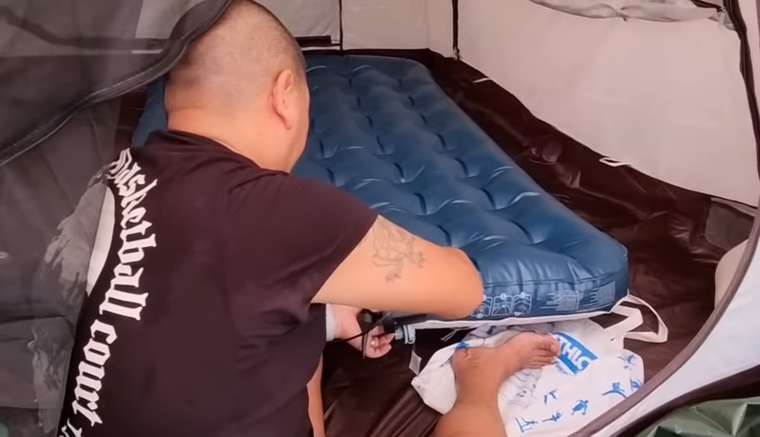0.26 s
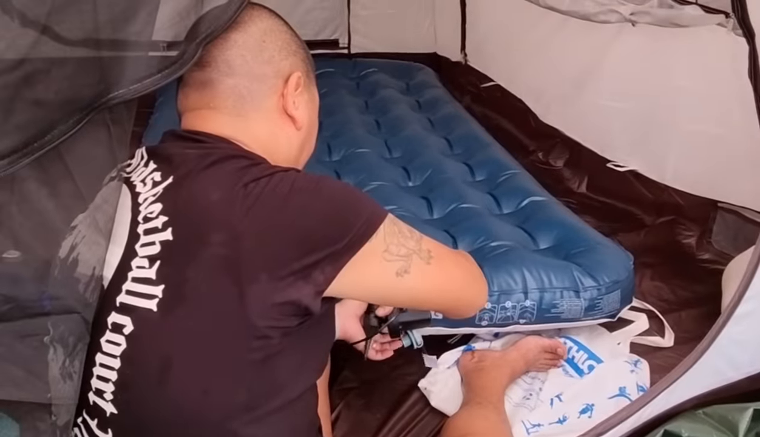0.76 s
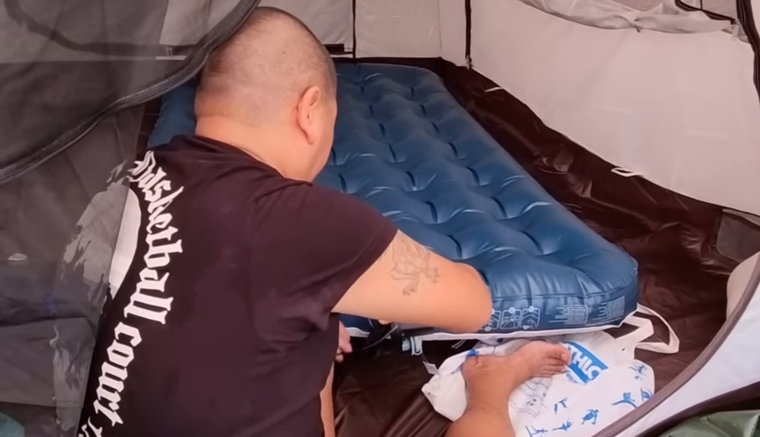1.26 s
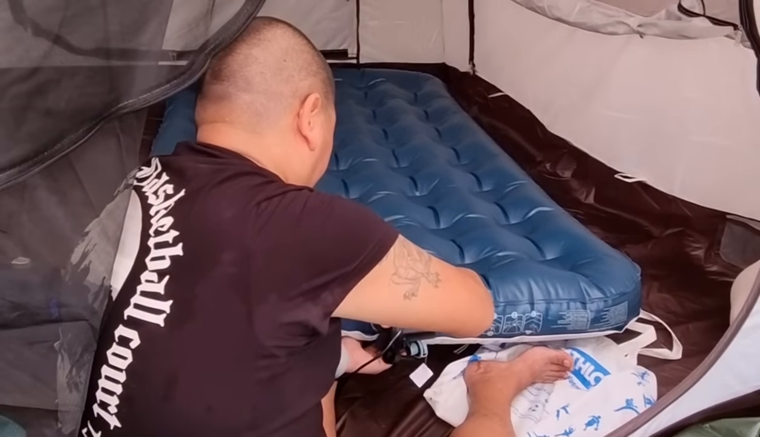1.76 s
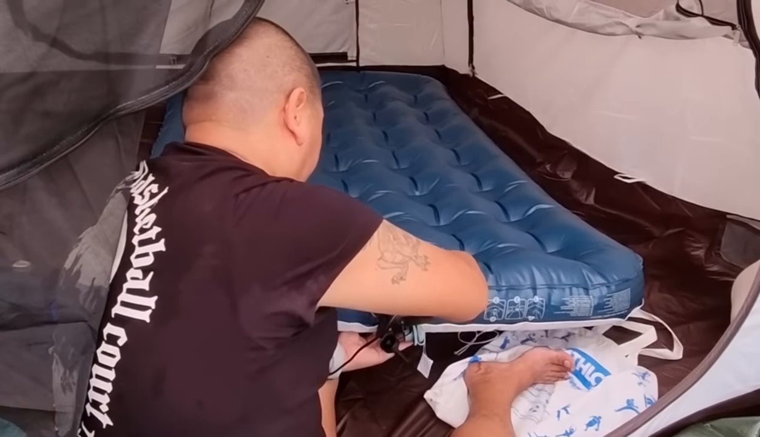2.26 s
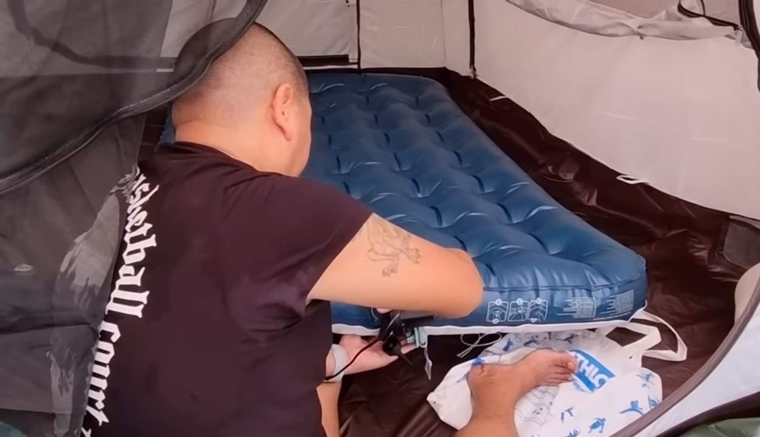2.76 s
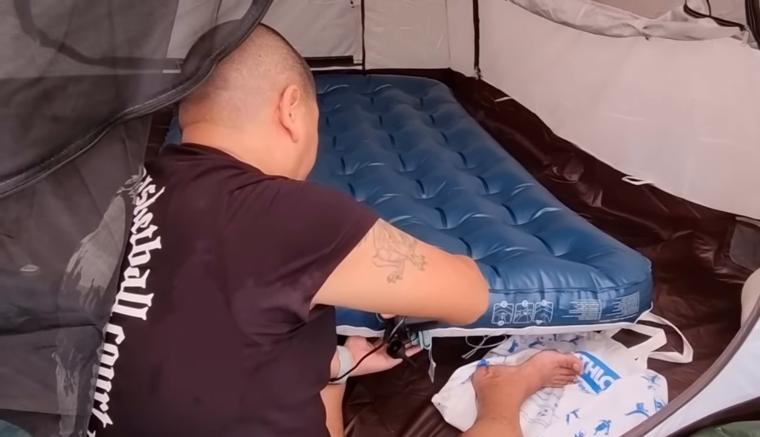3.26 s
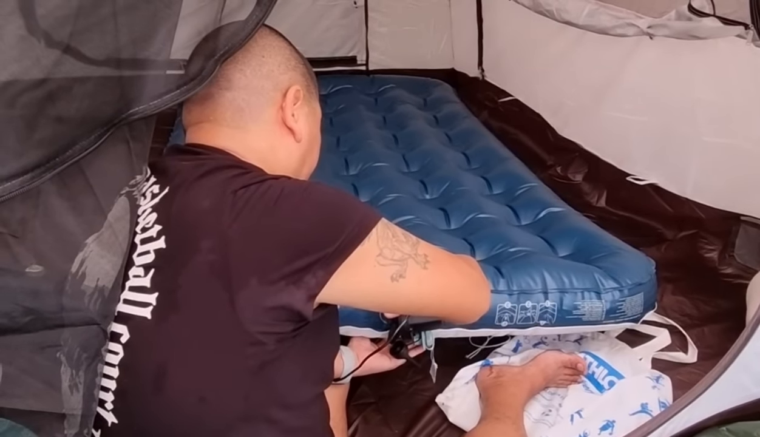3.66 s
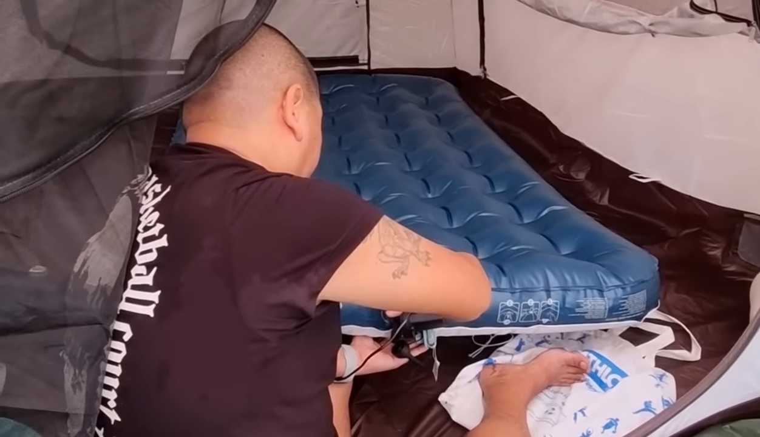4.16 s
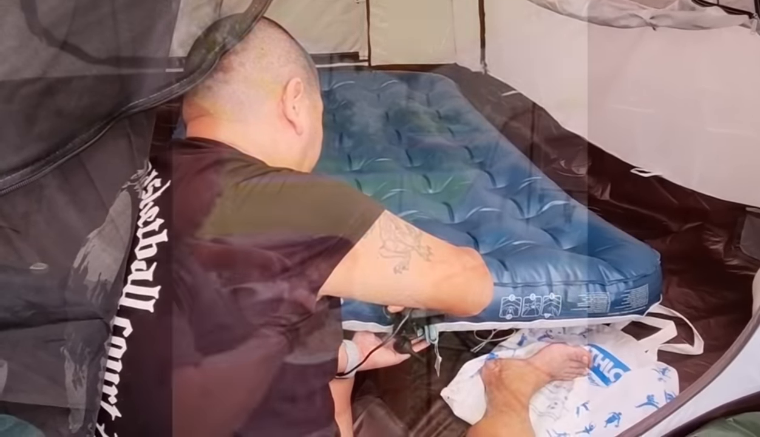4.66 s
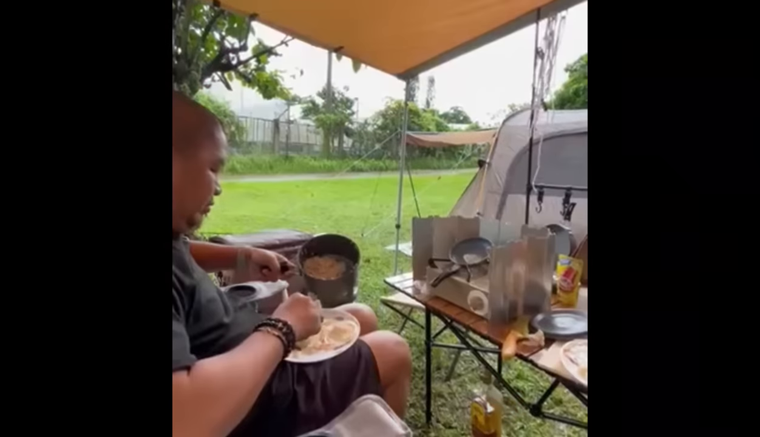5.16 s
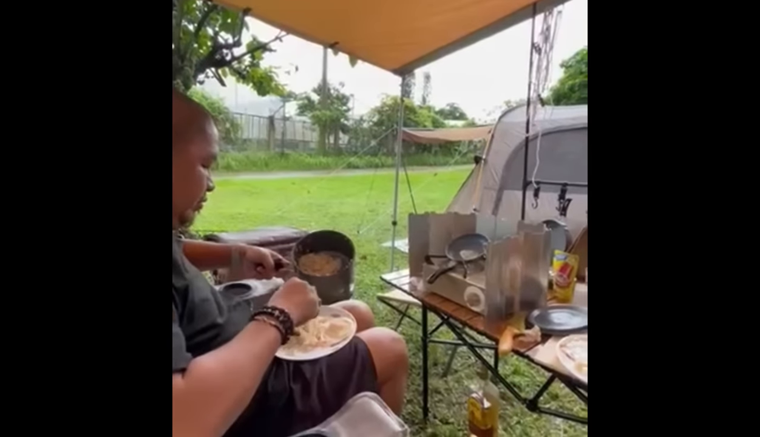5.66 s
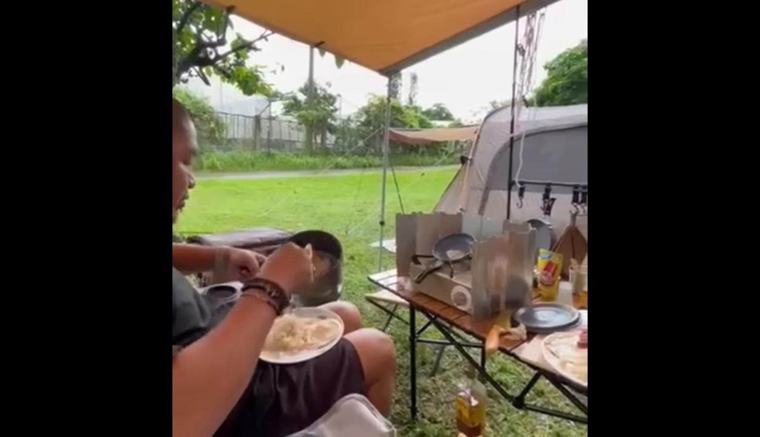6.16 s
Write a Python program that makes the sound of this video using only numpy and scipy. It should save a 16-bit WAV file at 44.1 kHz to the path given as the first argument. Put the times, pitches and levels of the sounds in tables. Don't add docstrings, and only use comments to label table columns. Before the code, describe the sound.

A small electric air pump whines and rushes inside a tent, cuts to brief silence, then cutlery clicks on a plate at a quiet campsite.

```python
import sys
import numpy as np
from scipy import signal
from scipy.fft import rfft, irfft, next_fast_len
from scipy.io import wavfile
from scipy.ndimage import uniform_filter1d

SR = 44100
rng = np.random.default_rng(int(sys.argv[2]) if len(sys.argv) > 2 else 0)


def natural_amplitude(level_db):
    exponent = np.asarray(level_db, float) / 20
    return 10 ** exponent


def materialize(psi):
    bounded = np.clip(np.atleast_2d(psi).T, -1, 1)
    quanta = np.round(bounded * 32767).astype(np.int16)
    wavfile.write(sys.argv[1], SR, quanta)


N = 282681
SIZE = next_fast_len(N)
FREQ_HZ = np.arange(SIZE // 2 + 1) * SR / SIZE
TIME_S = np.arange(N) / SR

START_HZ, RISE_HZ_PER_S, SLOWING_HZ_PER_S2 = 258.05, 3.95, .32
# time in seconds, seal 0-1.
NOZZLE_SEAL = [(0, 0.05), (.4, 0.12), (.7, .02), (1.17, 0.22), (1.27, 0.61), (1.45, 0.43), (1.58, 0.15),
               (1.72, 0), (1.78, 0.9), (1.87, 0.33), (1.97, 0.77), (2.08, 0.8), (2.15, 0.43), (2.21, 0.97),
               (2.45, 0.84), (3, 0.92), (4, 0.99), (4.75, 0.99)]
# time in seconds, shaft tone in dB.
PALM_COUPLING = [
    (0, -41.5),
    (.3, -41),
    (.5, -43),
    (.63, -39),
    (1.4, -38.5),
    (1.85, -39),
    (2.25, -36.5),
    (3.7, -36),
    (4.3, -34.5),
]
# multiple of shaft speed, then left early, left late, right early, right late in dB.
SHAFT_HARMONICS = [(2, -61, -48.5, -65, -52.5), (3, -70, -64, -38, -32), (4, -54, -40, -66, -67),
                   (5, -39, -41.5, -40.5, -52.5), (6, -40.5, -47.5, -42.5, -45),
                   (7, -45.5, -52, -44, -44.5), (8, -56, -59.5, -54.5, -61.5),
                   (9, -55.5, -56.5, -48.5, -53.5), (10, -55, -55, -55, -48), (11, -59, -49.5, -61, -53),
                   (12, -48.5, -50, -46, -43), (13, -52, -67, -48, -47), (14, -58, -65, -53.5, -58),
                   (15, -66, -64, -61, -61), (16, -56, -66.5, -52.5, -53), (17, -55, -64, -58, -53.5),
                   (18, -63, -60, -49.5, -50), (20, -64, -62, -70, -63.5), (24, -57, -49, -63, -54),
                   (25, -60, -62, -55.5, -52.5), (30, -55.5, -58, -55, -54.5), (35, -56, -58.5, -57, -58.5),
                   (36, -69, -57.5, -55, -72), (40, -66, -64.5, -62, -58)]
# right port lead early in rad, late in rad, change time in seconds.
GRIP_CHANGES = [(.8, 0, 3.2), (2.4, .5, 1.8), (2.5, .5, 1.6), (-2.2, -1.5, 1.4), (-3.1, -4.7, 1.2),
                (2.3, 1.8, 1.8), (-2.7, -2.8, 1.6), (2, -1.5, 2.9), (-2.5, 1.2, 1.15), (1.8, 3.1, 3.1),
                (3.1, 1.9, 1.15), (-2.9, -5.5, 2.6), (1, 2, 1.15), (1.5, 3.1, 1.9), (-.8, -3.3, 1.7),
                (2.3, .4, 2.6), (1.1, -2.6, 1.7), (-2.8, -5, 2.6), (3.1, 2.6, 1.05), (.7, 3.2, 1.2),
                (-1.7, -3.3, 3.1), (3.4, 2, .9), (-2.8, -2.2, 1.2), (-2.8, -4.4, 1.1)]
GRIP_CHANGE_S = .3
# multiple, middle in seconds, half length in seconds, boost in dB.
FLARES = [
    (12, 1.6, .4, 5),
    (14, .8, .35, 5),
    (30, .5, .3, 5),
    (13, 4.5, .4, 5),
    (30, 1.85, .2, 5),
    (16, .1, .25, 4),
    (16, 1.4, .3, 4),
    (7, 4, .5, 3),
]
# centre in Hz, width in Hz, left
# loose, left seated, right loose, right seated in dB per Hz, likeness of the ports -1 to 1, right port lead in
AIR_RESONANCES = [(106.2, 14.5, -56.5, -63, -52.5, -61.5, 0.99, -0.44),
                  (160, 23, -72, -68.5, -63, -67, 0.92, 0.4),
                  (299, 42, -78, -69.5, -69, -76.5, 0.3, 0.1),
                  (633, 54, -80.5, -71.5, -67, -70, 0.62, 1.14),
                  (833, 99, -73, -71, -57.5, -51.5, 0.61, -2),
                  (897, 61, -59.5, -61, -81, -64.5, 0.74, 0.4),
                  (978, 67, -64, -51.5, -59, -48, 0.95, 2),
                  (1111.5, 89, -70, -70, -59, -53.5, 0.79, 1.43),
                  (1160, 57, -71.5, -63, -66, -72, 0.44, -6), (1281, 73, -90, -64, -67, -60, 0.91, -2),
                  (1515, 88, -77, -64, -66.5, -55.5, 0.92, -2),
                     (1898, 82, -72.5, -66, -63.5, -63.5, 0.8, 3.5),
                     (2601, 174, -77, -67.5, -73.5, -62, 0.79, 1.85),
                     (2903, 160, -83, -75, -75, -66, 1, 4.5), (3170, 117, -85, -68, -73, -66, 0.26, 2.5),
                     (3570, 190, -87, -87, -79, -73, 0.41, 3.5),
                     (4265, 44, -71, -81, -68.5, -73.5, 0.37, -4),
                     (5150, 380, -78, -76, -78, -74, 0.66, -2),
                     (6700, 1330, -87.5, -83.5, -85.5, -81.5, 0.35, 0),
                     (7770, 60, -83, -82, -83.5, -83, 0.48, -11.5),
                     (9060, 310, -80, -83, -91, -90.5, .6, -5.5),
                     (10460, 440, -95, -95, -86.5, -76, .55, -2.6)]
# frequency in Hz, left loose, left seated, right loose, right seated in dB per Hz,
# likeness of the ports -1 to 1.
BROAD_RUSH = [(18.6, -85, -93, -83, -99, .7), (74.4, -65, -67.5, -63.5, -61, 0.94),
              (206, -77, -77, -73.5, -75.5, 0.56), (372, -88, -88, -77, -80, 0.83),
              (547, -76.5, -75, -81, -75.5, -0.067), (1100, -73, -81, -86, -67.5, 0.44),
              (2130, -77.5, -73, -77, -75.5, -0.004), (3830, -82.5, -77, -81, -75.5, -0.057),
              (5640, -90, -87, -82, -81.5, -0.15), (8140, -91, -82.5, -83, -78.5, -0.17),
              (10200, -88, -85.5, -87.5, -85.5, -0.01), (11360, -91, -84.5, -88, -85, -0.21),
              (11960, -86.5, -86, -84.5, -83, -0.072), (15700, -88.5, -84, -87.5, -84.5, 0.11)]
# start in seconds, ring in dB, ring in Hz, left minus right in dB.
SPOON_TAPS = [
    (4.941, -39, 520, 1),
    (5.064, -43.5, 356, 2),
    (5.222, -38, 387, 4),
    (5.41, -45.5, 805, 12),
    (5.625, -43, 795, 3),
    (5.883, -46, 406, 7),
    (6.386, -36, 356, 1),
]
SPOON_CLICK_REL_DB, SPOON_CLICK_HZ = -5.5, 1360
# start in seconds, click in dB, click in Hz, left minus right in dB.
FORK_TICKS = [
    (4.865, -57, 3500, 0),
    (4.969, -43, 1490, -2),
    (5.765, -41, 1290, 3),
    (5.950, -48, 7600, 2),
    (5.957, -45, 1400, 1),
    (5.975, -45, 2600, 1),
    (5.9875, -38, 2200, 0),
    (5.994, -42, 2600, 0),
    (6.223, -46, 2380, 3),
    (6.3838, -41, 1500, 3),
]
FORK_RING_REL_DB, FORK_RING_HZ = -7, 520
# start in seconds, length in seconds, frequency in Hz, level in dB.
ENGINE_DRONES = [
    (4.867, 0.28, 160, -50.5),
    (5.2, 0.28, 199.8, -54),
    (5.383, 0.12, 100, -53),
    (5.64, 0.16, 169, -53.5),
    (5.72, 0.31, 86.5, -47),
    (6.274, .2, 180, -52),
]
DRONE_FADE_S = 0.041
# frequency in Hz, left, right in dB per Hz, likeness of the ports -1 to 1.
CAMP_AIR = [(18, -92, -93, .98), (44.8, -68, -77, .98), (85, -64.5, -64, 1), (125, -73, -72, 1),
            (167, -71, -71, 1), (295, -80, -79.5, 0.89), (556, -84, -86, 0.5), (850, -80, -86, -0.06),
            (1770, -88.5, -91.5, -0.025), (2760, -85, -86, -0.59), (3950, -89, -89.5, -0.17),
            (6750, -95.5, -95.5, -0.44), (7400, -100, -100, 0.59), (11900, -104, -104, -0.68)]
# low edge, high edge, band width in Hz, share of mid lost, share of side lost 0-1.
BAND_DROPOUTS = [(2300, 3100, 130, .45, 0), (3100, 4800, 170, .6, 0), (4800, 5600, 400, .6, 0),
                 (5600, 7300, 850, .4, 0), (7300, 9100, 600, .02, .25), (9100, 11200, 1050, .45, 0),
                 (11200, 11900, 350, .7, .3), (11900, 22100, 10200, 1, 1)]
CUT_S, CUT_FADE_S, RETURN_S, RETURN_FADE_S = 4.7478, .003, 4.8598, .005


def walk(rate_hz, count):
    step = max(int(SR / rate_hz), 2)
    knots = rng.standard_normal((count, N // step + 2))
    return 1.184 * np.array([np.interp(np.arange(N) / step, np.arange(len(row)), row) for row in knots])


def air():
    return rfft(rng.standard_normal((2, SIZE))) * np.sqrt(SR / 2)


def ports(noise, shape, likeness, lead_rad=0.):
    shared = np.clip(likeness, -.99, .99)
    right = shared * np.exp(1j * lead_rad) * noise[0] + np.sqrt(1 - shared ** 2) * noise[1]
    return irfft(shape * np.array([noise[0], right]), SIZE)[:, :N]


def tent_shape(points_hz, k):
    return np.interp(np.log(FREQ_HZ + 1), np.log(points_hz), np.arange(len(points_hz)) == k, left=0, right=0)


def blend(x, left_from, left_to, right_from, right_to):
    return np.array([left_from + x * (left_to - left_from), right_from + x * (right_to - right_from)])


def whine(turns_rad, tone_db):
    port_db = np.array([[-4.5], [2.6]])
    out = natural_amplitude(tone_db + port_db) * np.sqrt(2) * np.sin(turns_rad)
    wander_db, flutter_db, wobble_rad = 1.2, 1.7, .3
    for (multiple, *levels_db), (early_rad, late_rad, change_s) in zip(SHAFT_HARMONICS, GRIP_CHANGES):
        multiple = round(multiple)
        grip = np.clip((TIME_S - change_s) / GRIP_CHANGE_S + .5, 0, 1)
        lead_rad = early_rad + grip * (late_rad - early_rad)
        rough = 1.7 if multiple < 6 else 1.
        db = blend(grip, *levels_db) + wander_db * walk(2.5, count=2)
        db = db + rough * flutter_db * walk(45, count=1)
        for flared, middle_s, half_s, boost_db in FLARES:
            if flared == multiple:
                db = db + boost_db * np.exp(-((TIME_S - middle_s) / half_s) ** 2)
        phase = multiple * turns_rad + rng.uniform(0, 2 * np.pi) + np.array([0 * lead_rad, lead_rad])
        phase = phase + rough * wobble_rad * walk(40, count=1)
        out = out + natural_amplitude(db + 4. - 3. * rough) * np.sqrt(2) * np.sin(phase)
    return out


def airflow(turns_rad, seal):
    gust_from_hz, chop_from_hz, chop_depth = 560, 1500, .21
    gusts_db = .75 * walk(9, count=1)
    noise, out = air(), 0
    for hz, width_hz, *levels_db, likeness, lead_rad in AIR_RESONANCES:
        shape = 1 / (1 + (1.275 * (FREQ_HZ - hz) / width_hz) ** 2) ** 1.53
        db = blend(seal, *levels_db) + (hz > gust_from_hz) * gusts_db + .92 * walk(13, count=1)
        out = out + natural_amplitude(db) * ports(noise, shape, likeness, lead_rad)
    noise, ridges = air(), cloth()
    points_hz = [row[0] for row in BROAD_RUSH]
    for k, (hz, *levels_db, likeness) in enumerate(BROAD_RUSH):
        db = blend(seal, *levels_db) + (hz > gust_from_hz) * gusts_db + .52 * walk(13, count=1)
        band = natural_amplitude(db) * ports(noise, ridges * tent_shape(points_hz, k), likeness)
        out = out + band * (1 + chop_depth * (hz > chop_from_hz) * np.sin(2 * turns_rad))
    return out


def cloth(ripple_db=3.0, spacing_hz=69.9):
    knots = rng.standard_normal((2, 400))
    ridges = [np.interp(FREQ_HZ / spacing_hz, np.arange(400), row) for row in knots]
    return natural_amplitude(ripple_db * np.array(ridges))


def taps(ring_s=.009, click_s=.004, attack_s=.0005):
    out, t = np.zeros((2, N + SR)), np.arange(int(.08 * SR)) / SR
    spoon = [(s, db, hz, db + SPOON_CLICK_REL_DB, SPOON_CLICK_HZ, pan) for s, db, hz, pan in SPOON_TAPS]
    fork = [(s, db + FORK_RING_REL_DB, FORK_RING_HZ, db, hz, pan) for s, db, hz, pan in FORK_TICKS]
    for start_s, ring_db, ring_hz, click_db, click_hz, pan_db in spoon + fork:
        ring = natural_amplitude(ring_db) * np.sin(2 * np.pi * ring_hz * t) * np.exp(-t / ring_s)
        bright = signal.butter(2, [.5 * click_hz, 1.35 * click_hz], "bandpass", fs=SR, output="sos")
        click = natural_amplitude(click_db + 9) * signal.sosfilt(bright, rng.standard_normal(len(t)))
        click = click * np.exp(-t / click_s) * (1 - np.exp(-t / attack_s))
        start = int(start_s * SR)
        out[:, start:start + len(t)] += (ring + click) * natural_amplitude(np.array([[pan_db], [-pan_db]]) / 2)
    return signal.sosfilt(signal.butter(10, 11300, fs=SR, output="sos"), out[:, :N])


def drones(wobble_rad=.5, flutter_db=1.0):
    out = 0
    for start_s, length_s, hz, db in ENGINE_DRONES:
        inside_s = np.minimum(TIME_S - start_s, start_s + length_s - TIME_S)
        fade = np.clip(inside_s / DRONE_FADE_S + .5, 0, 1)
        level = natural_amplitude(db + flutter_db * walk(13, count=1))
        phase = 2 * np.pi * hz * TIME_S + wobble_rad * walk(16, count=1)
        out = out + fade * level * np.sqrt(2) * np.sin(phase)
    return out


def camp():
    noise, out = air(), 0
    points_hz = [row[0] for row in CAMP_AIR]
    for k, (_, left_db, right_db, likeness) in enumerate(CAMP_AIR):
        db = np.array([[left_db], [right_db]]) + 1.2 * walk(14, count=1)
        out = out + natural_amplitude(db) * ports(noise, tent_shape(points_hz, k), likeness)
    return out


def drop_bands(x):
    window = np.sin(np.pi * (np.arange(1024) + .5) / 1024)
    mid_side = np.array([x[0] + x[1], x[0] - x[1]]) / 2
    hz, frames, z = signal.stft(mid_side, SR, window, 1024)
    for low_hz, high_hz, width_hz, *shares in BAND_DROPOUTS:
        for edge_hz in np.arange(low_hz, high_hz, width_hz):
            need = uniform_filter1d(rng.standard_normal((2, len(frames))), size=4)
            limit = np.array([[np.quantile(row, share)] for row, share in zip(need, shares)])
            lost = need <= limit
            z[:, (hz >= edge_hz) & (hz < edge_hz + width_hz)] *= ~lost[:, None]
    mid, side = signal.istft(z, SR, window, 1024)[1][:, :N]
    return np.array([mid + side, mid - side])


def scene():
    seal = np.interp(TIME_S, *np.transpose(NOZZLE_SEAL))
    shaft_hz = START_HZ + RISE_HZ_PER_S * TIME_S - SLOWING_HZ_PER_S2 * TIME_S ** 2
    turns_rad = 2 * np.pi * np.cumsum(shaft_hz + .15 * walk(6, count=1)[0]) / SR
    tone_db = np.interp(TIME_S, *np.transpose(PALM_COUPLING)) + .5 * walk(7, count=1)
    tent = whine(turns_rad, tone_db) + airflow(turns_rad, seal)
    campsite = drop_bands(camp()) + drones() + taps()
    before = np.clip((CUT_S - TIME_S) / CUT_FADE_S, 0, 1)
    after = np.clip((TIME_S - RETURN_S) / RETURN_FADE_S, 0, 1)
    return before * tent + after * campsite


def low_pass(x):
    return signal.sosfilt(signal.butter(12, 17000, fs=SR, output="sos"), x)


def record(dry):
    return low_pass(dry)


dry = scene()
out = record(dry)
materialize(out)
```